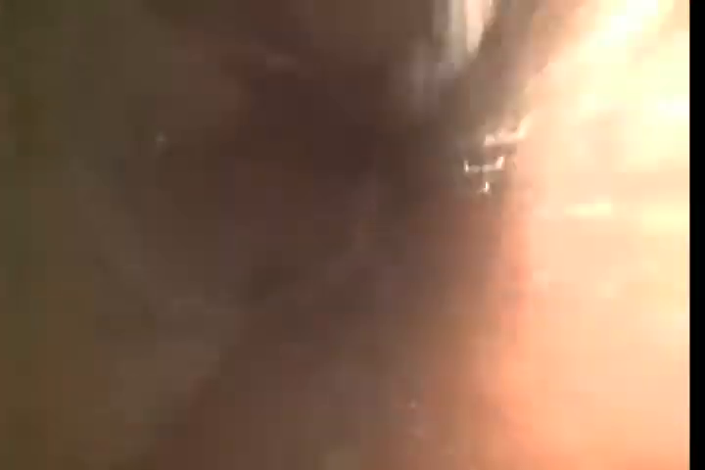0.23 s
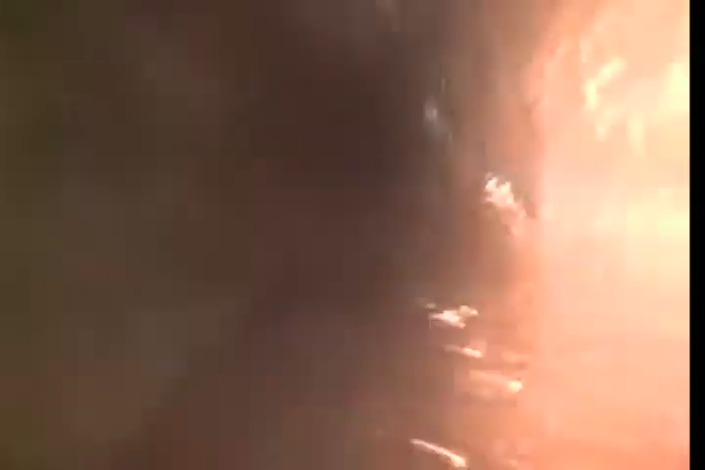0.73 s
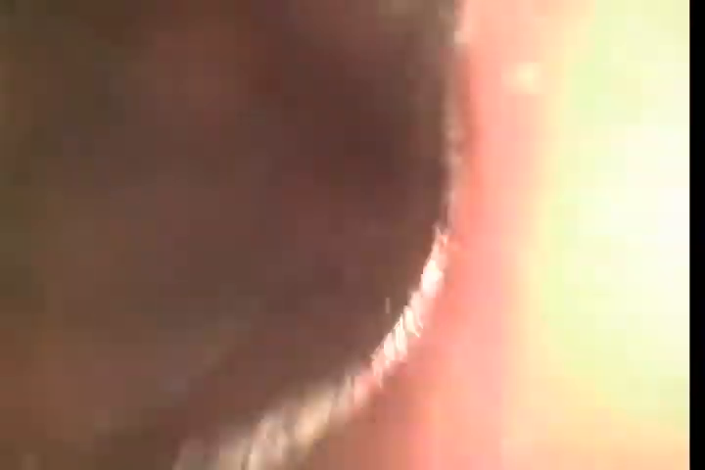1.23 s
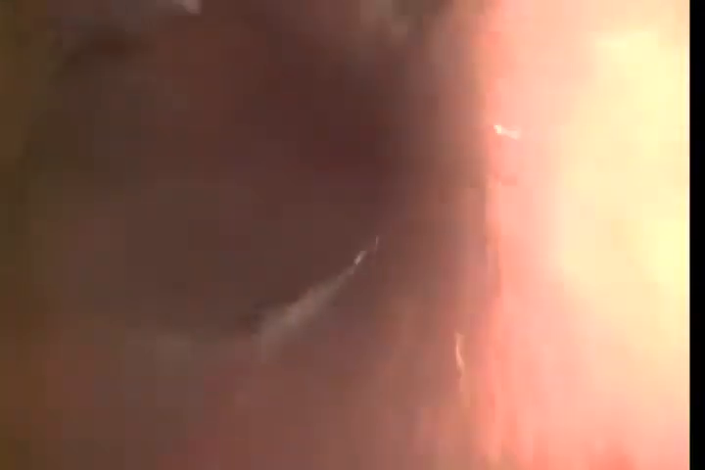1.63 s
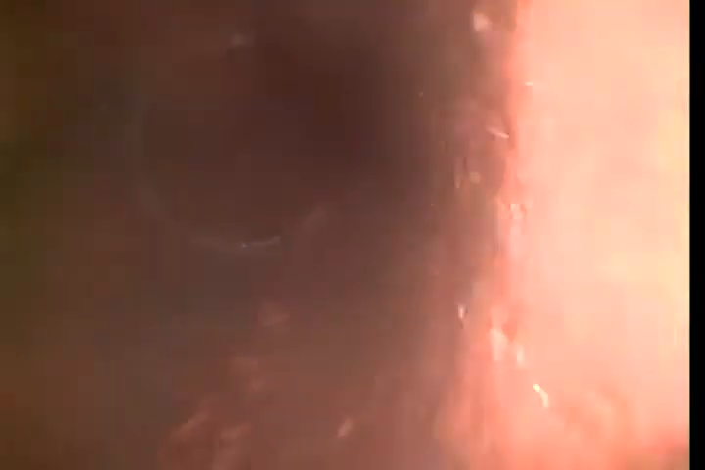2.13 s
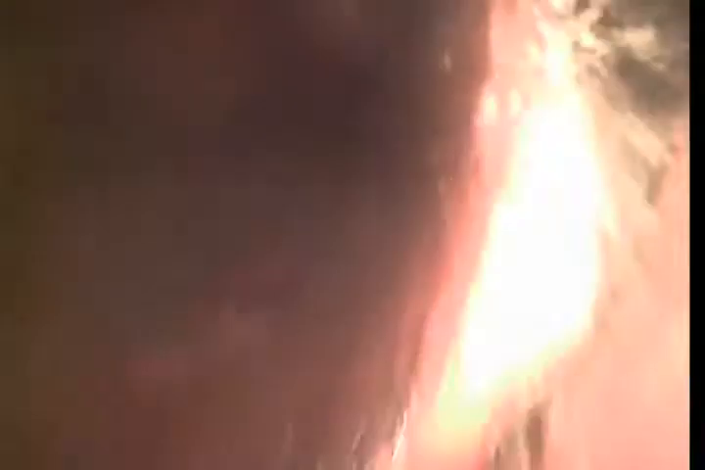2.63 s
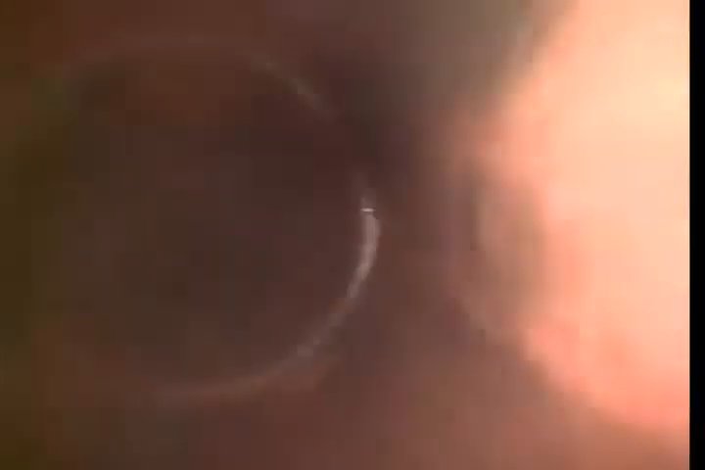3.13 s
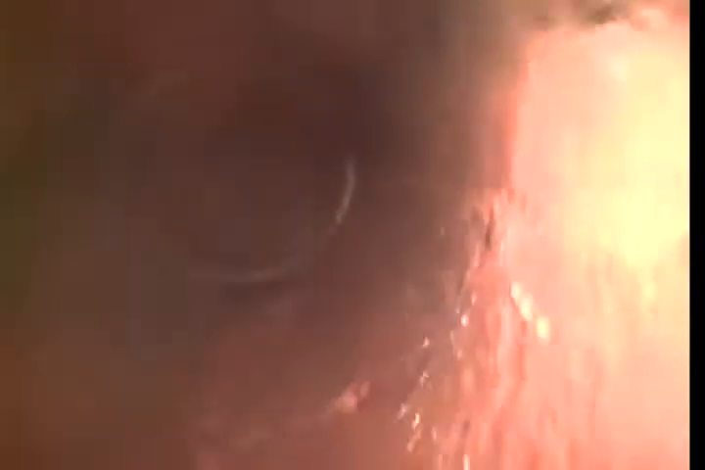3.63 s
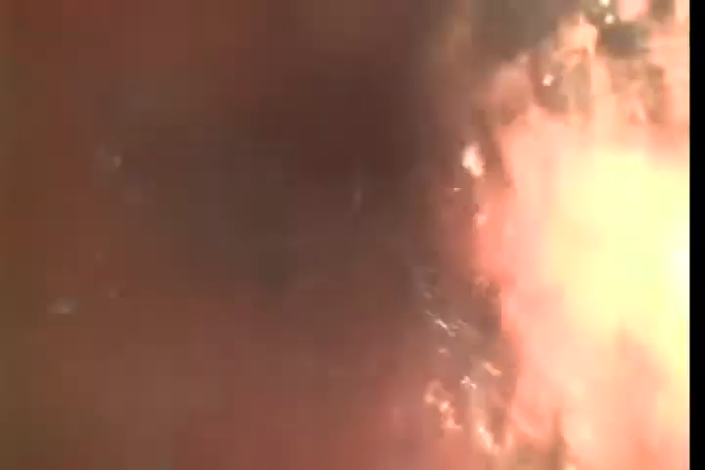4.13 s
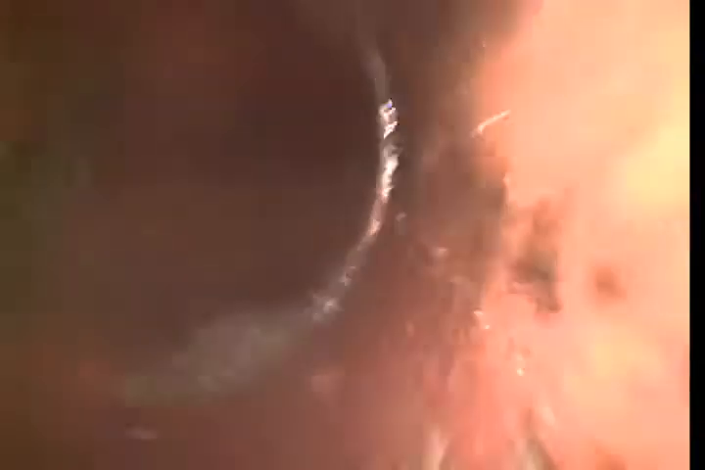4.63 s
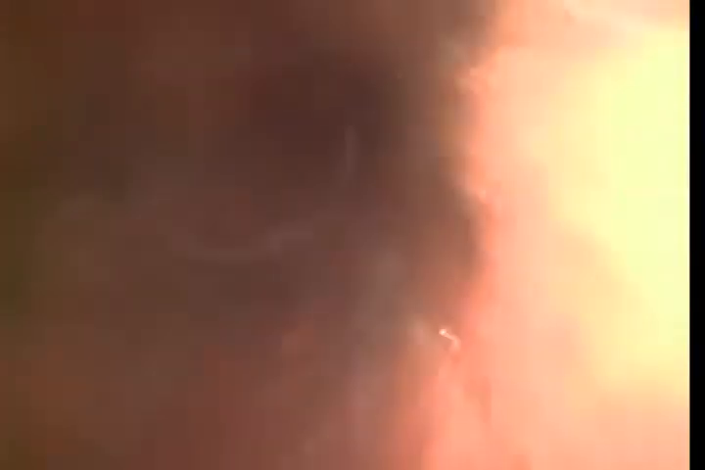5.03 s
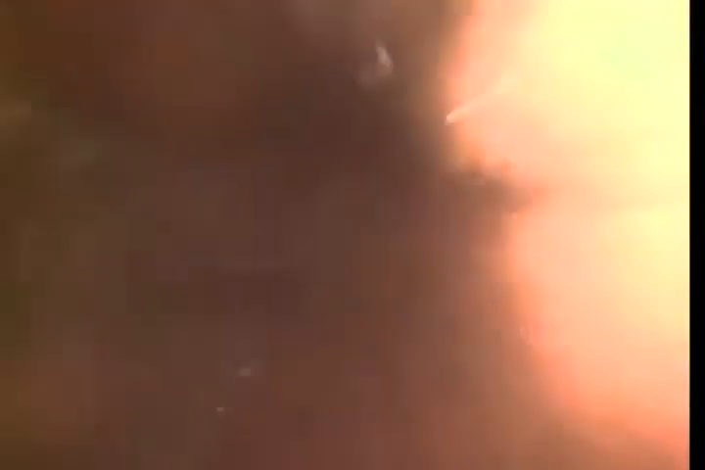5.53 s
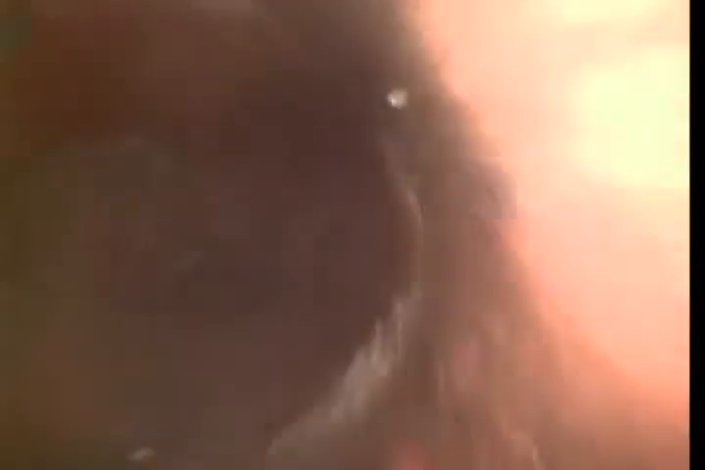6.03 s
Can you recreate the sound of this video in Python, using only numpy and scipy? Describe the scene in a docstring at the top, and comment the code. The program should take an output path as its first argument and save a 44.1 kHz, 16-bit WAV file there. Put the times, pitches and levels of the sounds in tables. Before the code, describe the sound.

A stiff inspection cable is hauled from a pipe onto its reel, heard close through a muffled, narrow-band microphone. A rough, grainy sliding rustle runs throughout. Light knocks and ticks dot the first second, with a tiny squeak at 0.2; a firmer double knock lands around 1.1, a strong thump at 1.83, and two more knocks near 2.5. A faint thin whistle appears at 2.75. At 3.04 the coil slips, giving a hollow low boom around a steady pitch that fades over half a second. From 3.67 knocks gather, bursting into a hard, distorted clatter at 3.75-3.95, with hissier scraping. Loose turns rattle away, with knocks at 4.0, 4.2, 4.3 and 4.5. Sparser knocks, ticks, dull brushes and faint squeaks continue from 4.7 to 5.75; a solid knock hits at 6.05 before closing ticks and rustle.

```python
"""A rough rustle with knocks and ticks: a sewer camera's push cable is pulled from a pipe and fed onto its reel.
Dense grains of collision make the sliding; blows and rubs pass through the resonances of the reel frame.
The cable ticks against its guide, brushes the frame and squeaks; slips in the coil give a hollow boom,
then a burst of hard knocks clatters.
A narrow-band recorder with a notch in its response picks it up and overloads on the hardest blows."""
import sys
import numpy as np
from scipy import signal
from scipy.fft import rfft, irfft, next_fast_len
from scipy.io import wavfile
from scipy.ndimage import uniform_filter1d

SR = 44100
rng = np.random.default_rng(int(sys.argv[2]) if len(sys.argv) > 2 else 0)


def log_audio(samples):
    """Write samples as a 16-bit WAV file to the path given in sys.argv[1]."""
    # one column per channel
    frames = np.atleast_2d(samples).T
    # limit to full scale, then quantise
    limited = np.clip(frames, -1, 1)
    pcm = np.round(limited * 32767).astype(np.int16)
    wavfile.write(sys.argv[1], SR, pcm)


N = 276727
TIME = np.arange(N) / SR

# Cable strikes the frame. Each row: start in seconds, thud, clack and click level in dB before the register
# gains, rattle level in dB re the hit before the register offsets.
KNOCKS = [(0.034, -42.5, -34, -38, -9), (0.125, -34, -36.5, -39, 10.5), (0.431, -24, -25, -32, -5.5),
          (0.711, -43, -34.5, -36, -15), (0.812, -34, -27, -43.5, -8), (1.025, -33, -33, -41, -11),
          (1.113, -27, -19.5, -25, -5), (1.155, -24, -28.5, -40, 0), (1.829, -14.5, -21, -21, -9.5),
          (2.465, -29, -32.5, -31.5, 0.5), (2.506, -21.5, -25, -16.5, -7), (3.665, -27, -30, -44, -7.5),
          (3.753, -16, -24.5, -21, 8), (3.767, -13, -13, -18, -6), (3.851, -15, -16.5, -20, 2),
          (3.875, -11.5, -7.5, -11, -3), (3.886, -9, -9.5, -11, -6.5), (3.899, -14.5, -11, -34, -14.5),
          (3.92, -10, -11.5, -15, -10), (3.939, -15.5, -21.5, -20, -15.5),
          (4.003, -20.5, -16.5, -22.5, -6.5), (4.197, -26.5, -24, -37, -7.5), (4.281, -17, -15, -25, -7),
          (4.544, -25.5, -23.5, -35.5, -4), (4.781, -26.5, -28, -50, -7.5), (4.888, -24, -19, -27, -5.5),
          (5.113, -28.5, -24.5, -45.5, -1.5), (5.204, -29.5, -26, -48.5, -13),
          (5.737, -26, -28.5, -32, -3.5), (6.052, -13.5, -17, -14.5, -9.5)]
# Registers of the frame's sound: low, middle, upper, top. Each row: lower edge in Hz, upper edge in Hz.
REGISTERS_HZ = [(22, 600), (600, 1150), (1150, 2000), (2100, 5200)]


def from_db(db):
    """Decibels to gain."""
    return 10 ** (np.asarray(db) / 20)


def rms_one(x):
    """Scale to unit rms."""
    return x / np.sqrt(np.mean(x ** 2) + 1e-20)


def peak_one(x, size=350):
    """Scale so that the loudest few milliseconds (size in samples) have unit rms."""
    return x / np.sqrt(uniform_filter1d(x ** 2, size).max() + 1e-20)


def dying(t, t60_s):
    """Exponential decay, 60 dB down after t60_s."""
    return np.exp(-np.log(1000) * t / t60_s)


def add(out, start_s, sound):
    """Mix a sound in from start_s, cut at the end of the scene."""
    start = max(round(start_s * SR), 0)
    out[start:start + len(sound)] += sound[:N - start]


def band(x, edges_hz):
    """Steep causal band-pass."""
    sos = signal.butter(N=4, Wn=edges_hz, btype="band", fs=SR, output="sos")
    return signal.sosfilt(sos, x)


def roll_off(x, hz, kind):
    """Gentle low-pass or high-pass."""
    return signal.sosfilt(signal.butter(2, hz, kind, fs=SR, output="sos"), x)


def resonance(x, hz, width_hz):
    """One mode, gain 1 at its top."""
    return signal.lfilter(*signal.iirpeak(hz, hz / width_hz, SR), x)


def wobble(count, size=200):
    """Quick random wavering with spread about 1: one second of smoothed noise, cut to count samples."""
    return rms_one(uniform_filter1d(rng.standard_normal(SR), size))[:count]


def grains(count, per_s, spread_db):
    """Tiny collisions at random moments, of uneven size and sign; rms 1."""
    size_db = spread_db * np.minimum(rng.exponential(1, count), 4)
    sizes = from_db(size_db) * rng.choice([-1, 1], count)
    happens = rng.random(count) < per_s / SR
    return rms_one(sizes * happens)


def frame(force):
    """A contact force takes on its broad colour, then sets each resonance of the reel frame ringing."""
    # Colour of a contact before the frame rings. Each row: frequency in Hz, level in dB.
    contact_colour = [(25, -6.5), (70, -2.5), (130, -3.5), (180, -3), (270, 0.5), (480, -0.5), (620, -7),
                      (900, -3), (1500, -2), (2000, -0.5), (2450, -3.5), (3000, 3.5), (3550, -2),
                      (4000, -9.5), (4500, -6)]
    # Resonances of the reel frame. Each row: frequency in Hz, width in Hz, lift in dB.
    frame_modes = [(119.4, 15, 11.5), (163, 33, 3.5), (201, 80, 1.5), (232.6, 35, 7), (272.4, 12.5, 12),
                   (306.5, 17, 7), (363, 38, 7.5), (390, 13, 8.5), (438, 13, 3), (556, 9.9, 4),
                   (670, 9.5, 0), (713.5, 26, 8), (759, 29, 8), (814, 37, 6.5), (829, 110, 3.5),
                   (997, 49, 1.5), (1049, 20, 8), (1102, 13, 2.5), (1305, 25, 7), (1435, 78, 7),
                   (1560, 17, 0.5), (2438, 27, 4.5), (2510, 29, 4.5), (3520, 5, 8.5), (3793, 8.7, 3)]
    colour_hz, colour_db = np.transpose(contact_colour)
    size = next_fast_len(len(force) + SR // 20)
    bins_hz = np.maximum(np.fft.rfftfreq(size, 1 / SR), 1)
    colour = from_db(np.interp(np.log(bins_hz), np.log(colour_hz), colour_db))
    x = irfft(rfft(force, size) * colour, size)[:len(force)]
    for hz, width_hz, lift_db in frame_modes:
        x = x + (from_db(lift_db) - 1) * resonance(x, hz, width_hz)
    return x


def struck(force, edges_hz, level_db):
    """One register of the frame's answer to a force, at a given top level."""
    return from_db(level_db) * peak_one(band(frame(force), edges_hz))


def rubbing(levels_db, per_s, spread_db):
    """A dense stream of small catches shakes the frame; one level each for rumble, clatter and hiss."""
    low, middle, upper, top = REGISTERS_HZ
    rub = frame(grains(N, per_s, spread_db))
    bands_hz = [low, (middle[0], upper[1]), top]
    return sum(from_db(db) * rms_one(band(rub, edges_hz)) for edges_hz, db in zip(bands_hz, levels_db))


def blow(contact_s, rattle_db, rattle_t60_s, solid, rattle_per_s=2000, spread_db=1.5):
    """Force of one blow: a solid hit and a scuff of a few ms share the energy, then loose turns rattle out."""
    t = np.arange(SR * 2 // 5) / SR
    solid = np.clip(solid, 0, 1)
    touch = t / contact_s * np.exp((1 - (t / contact_s) ** 2) / 2)
    force = np.sqrt(1 - solid) * touch * rng.standard_normal(len(t))
    force[round(contact_s * SR / 2)] += np.sqrt(solid * np.sum(touch ** 2))
    rattle = from_db(rattle_db) * dying(t, rattle_t60_s) * (1 - np.exp(-t / contact_s))
    return force + rattle * grains(len(t), rattle_per_s, spread_db)


def sliding(rumble_gain_db=0.0, clatter_gain_db=-1.0, hiss_gain_db=3.5, hiss_share=0.55, uneven_db=1.61):
    """The jacket drags over grit, a little unevenly; the middle range follows both rumble and hiss."""
    # Cable sliding. Each row: time in seconds, rumble and hiss level in dB before the gains.
    slide_levels = [(0.0, -35.5, -43.5), (0.45, -41, -41), (0.96, -37.5, -46.5), (1.29, -38.5, -40.5),
                    (1.73, -35.5, -46.5), (2.04, -38, -45), (3.05, -39.5, -44.5), (3.25, -37.5, -38.5),
                    (3.51, -40, -46.5), (3.74, -40, -43.5), (3.84, -27.5, -30), (3.93, -39, -28),
                    (4.07, -37.5, -35.5), (4.59, -36.5, -43.5), (4.99, -36, -39.5), (5.26, -37, -45.5),
                    (5.9, -41.5, -41.5), (6.27, -38.5, -39.5)]
    bass_hz, bass_db = 132, -9  # a long drag moves the frame as a whole
    s, *columns = np.transpose(slide_levels)
    rumble_db, hiss_db = (np.interp(TIME, s, column) for column in columns)
    clatter_db = rumble_db + hiss_share * (hiss_db - rumble_db)
    levels_db = [rumble_db + rumble_gain_db, clatter_db + clatter_gain_db, hiss_db + hiss_gain_db]
    grip = from_db(uneven_db * rms_one(uniform_filter1d(rng.standard_normal(N), size=2500)))
    drag = rubbing(levels_db, per_s=4200, spread_db=2.0)
    bass = rms_one(roll_off(frame(grains(N, per_s=1500, spread_db=2.0)), bass_hz, "low"))
    return grip * (drag + from_db(rumble_db + bass_db) * bass)


def knocks(thud_gain_db=1.0, clack_gain_db=0.83, edge_gain_db=-1.0, click_gain_db=6.0,
           glancing_db=0.0, rattle_t60_s=0.31, glancing_t60_s=0.17):
    """Every knock has a low thud, a clack and a brief click, in shares of its own."""
    thud_low_cut_hz = 204  # a short blow hardly moves the frame as a whole
    out = np.zeros(N)
    low, middle, upper, top = REGISTERS_HZ
    for s, thud_db, clack_db, click_db, rattle_db in KNOCKS:
        # a glancing touch is mostly scrape: it lacks the solid hit and dies sooner
        firm = 1 / (1 + from_db(2 * (rattle_db - glancing_db)))
        t60_s = firm * rattle_t60_s + (1 - firm) * glancing_t60_s
        push = roll_off(blow(0.00439, rattle_db, t60_s, solid=0.87 * firm), thud_low_cut_hz, "high")
        thud = struck(push, low, thud_db + thud_gain_db)
        hit = blow(0.0033, rattle_db, t60_s, solid=0.34 * firm)
        clack = struck(hit, middle, clack_db + clack_gain_db)
        # the harder the contact clicks, the further the clack reaches upward
        edge_db = (clack_db + click_db) / 2 + edge_gain_db
        edge = struck(blow(0.0048, rattle_db + 0.5, t60_s, solid=0.089 * firm), upper, edge_db)
        snap = blow(0.0024, rattle_db - 2.5, t60_s, solid=0.022 * firm)
        click = struck(snap, top, click_db + click_gain_db)
        add(out, s, thud + clack + edge + click)
    return out


def loose_turns(rumble_db=-19, clatter_db=-19, hiss_db=-21, rise_s=0.035, t60_s=1.0):
    """The knocks' energy piles up in the loose turns of cable on the reel and rustles away."""
    energy = np.zeros(N)
    for s, thud_db, clack_db, *_ in KNOCKS:
        t = np.maximum(TIME - s, 0)
        shake = from_db((thud_db + clack_db) / 2) * np.minimum(t / rise_s, 1) * dying(t, t60_s)
        energy += shake ** 2
    return np.sqrt(energy) * rubbing([rumble_db, clatter_db, hiss_db], per_s=3700, spread_db=3.5)


def ticks(ring_width_hz=260, ring_db=7, body_gain_db=3, click_gain_db=7.0):
    """Light touches leave the low modes still; each rings briefly at a pitch set by where it lands."""
    # Touches on the guide. Each row: start in seconds, ring in Hz, body and click level in dB before the gains.
    guide_touches = [(0.074, 3940, -53, -35), (0.209, 3100, -45.5, -30), (0.237, 3340, -38.5, -29.5),
                     (0.711, 2500, -30, -41.5), (1.008, 2960, -41, -29), (1.025, 4000, -46.5, -37.5),
                     (1.217, 3100, -35.5, -34), (1.285, 3600, -36, -39.5), (1.365, 2700, -36, -31),
                     (2.363, 2980, -51, -34), (2.421, 4070, -50, -30.5), (2.447, 2370, -35, -31.5),
                     (3.126, 4000, -45, -23), (3.503, 3800, -45.5, -35.5), (4.348, 3530, -37, -34.5),
                     (4.42, 3650, -34, -34), (4.734, 3630, -40, -39), (5.127, 2690, -29, -32),
                     (5.536, 3020, -45, -34), (6.125, 3200, -32, -33), (6.222, 3570, -36.5, -39)]
    out = np.zeros(N)
    low, middle, upper, top = REGISTERS_HZ
    for s, ring_hz, body_db, click_db in guide_touches:
        touch = blow(0.0022, rattle_db=-6, rattle_t60_s=0.16, solid=0.3)
        ringing = touch + from_db(ring_db) * resonance(touch, ring_hz, ring_width_hz)
        body = struck(touch, upper, body_db + body_gain_db)
        click = struck(ringing, top, click_db + click_gain_db)
        add(out, s, body + click)
    return out


def scuffs(clatter_db=-4, hiss_db=-4, attack_s=0.0088, release_s=0.036, dull_hz=1200):
    """Dull brushes along the frame: each sets in, holds while the cable touches and fades."""
    # Each row: start in seconds, length in seconds before the release, pressure in dB.
    brushes = [(0.139, 0.036, -35), (0.874, 0.018, -39), (1.459, 0.08, -32.5), (2.38, 0.086, -32),
               (3.69, 0.065, -29.5), (4.243, 0.022, -24), (4.566, 0.044, -37.5), (5.139, 0.032, -33.5),
               (5.833, 0.015, -35), (5.999, 0.078, -29.5)]
    pressure = np.zeros(N)
    for s, length_s, level_db in brushes:
        attack = np.clip((TIME - s) / attack_s, 0, 1)
        release = np.clip(1 - (TIME - s - length_s) / release_s, 0, 1)
        pressure += from_db(level_db) * attack * release
    rub = rubbing([0, clatter_db, hiss_db], per_s=1700, spread_db=-0.5)
    return pressure * roll_off(rub, dull_hz, "low")  # soft contacts lose their upper range


def squeaks(waver_hz=9.0, flutter=0.23):
    """Brief squeaks and faint whistles: thin tones that swell and fade, unsteady in pitch and strength."""
    # Each row: start in seconds, length in seconds, mean pitch in Hz, peak level in dB before the flutter.
    thin_tones = [(0.21, 0.02, 1530, -22.5), (0.22, 0.18, 1520, -42), (2.73, .22, 1860, -39),
                  (4.73, 0.03, 1720, -31), (5.24, 0.17, 2110, -41), (5.598, 0.14, 1416, -37)]
    out = np.zeros(N)
    for s, length_s, hz, level_db in thin_tones:
        count = int(length_s * SR)
        tone = np.sin(2 * np.pi * np.cumsum(hz + waver_hz * wobble(count)) / SR)
        strength = np.sqrt(np.hanning(count)) * (1 + flutter * wobble(count))
        add(out, s, from_db(level_db) * strength * tone)
    return out


def shove(attack_s=0.011, slip_t60_s=0.43, settle_db=-20.5, settle_s=0.48):
    """Strength of the rubbing in the coil: quick slips and a weaker settling rub add up in energy."""
    # The coil slips. Each row: start in seconds, level in dB.
    slips = [(3.039, -20), (3.076, -16), (3.122, -26), (3.195, -25.5)]
    energy = np.zeros(N)
    for s, level_db in slips:
        t = np.maximum(TIME - s, 0)
        settling = from_db(settle_db) * np.clip(1 - (t / settle_s) ** 4, 0, 1)
        swell = np.minimum(t / attack_s, 1)
        energy += (from_db(level_db) * swell * (dying(t, slip_t60_s) + settling)) ** 2
    return np.sqrt(energy)


def booms(size=700, hiss_db=-14, dull_hz=1100):
    """Turns of cable slip over each other; the rough rubbing hisses and drives the hollow modes of the coil."""
    # Hollow modes of the coil. Each row: frequency in Hz, width in Hz, relative level in dB.
    coil_modes = [(137, 5.2, 4), (208, 34, -5), (280, 10, -2), (339, 12, -0.5), (383.4, 13.4, 13),
                  (411, 20, 0.5), (480, 110, -6.5), (683, 43, -11), (785, 18, -3.5), (793, 14, -9),
                  (1053, 31, -26)]
    rub = grains(N, per_s=3000, spread_db=1.5) + 1e-18
    ring = sum(from_db(db) * resonance(rub, hz, width_hz) for hz, width_hz, db in coil_modes)
    ring = roll_off(ring, dull_hz, "low")
    # levelled, so that the strength of the shove alone sets the loudness
    even = ring / np.sqrt(np.abs(uniform_filter1d(ring ** 2, size)) + 1e-12)
    hiss = rms_one(band(frame(rub), REGISTERS_HZ[-1]))
    return shove() * (even + from_db(hiss_db) * hiss)


def scene():
    """Everything the cable and its reel do, heard from one point."""
    return (sliding() + knocks() + loose_turns() + ticks() + scuffs() + squeaks() + booms())[None]


def record(dry):
    """A saturating preamplifier, a wide notch and a telephone-like bandwidth; overshoots clip, the top is cut."""
    preamp_limit, full_scale = 0.61, 0.71
    notch_hz, notch_width_hz, bandwidth_hz, cutoff_hz = 1996, 1715, 3965, 16000
    rounded = dry / (1 + (dry / preamp_limit) ** 8) ** (1 / 8)
    notched = signal.lfilter(*signal.iirnotch(notch_hz, notch_hz / notch_width_hz, SR), rounded)
    taps = signal.firwin(numtaps=129, cutoff=bandwidth_hz, window=("kaiser", 7), fs=SR)
    narrow = signal.fftconvolve(notched, taps[None], "same")
    clipped = np.clip(narrow, -full_scale, full_scale)
    return signal.sosfilt(signal.cheby2(12, 70, cutoff_hz, fs=SR, output="sos"), clipped)


dry = scene()
out = record(dry)
log_audio(out)
```